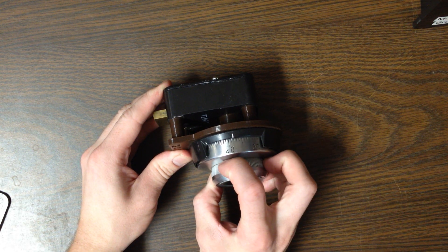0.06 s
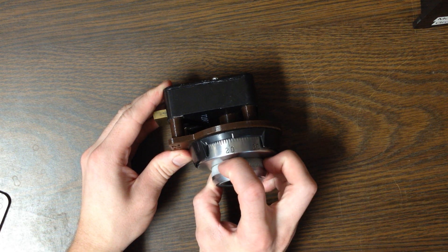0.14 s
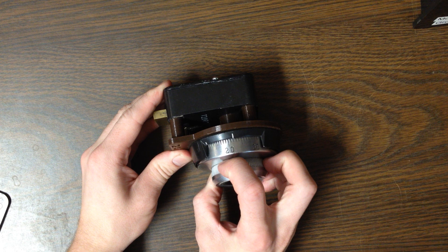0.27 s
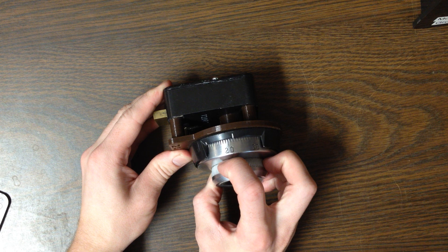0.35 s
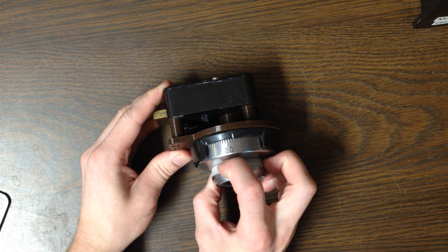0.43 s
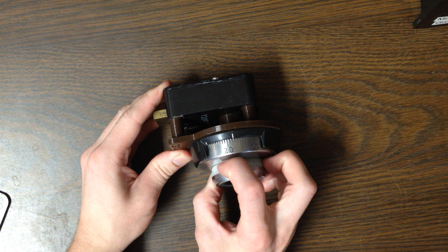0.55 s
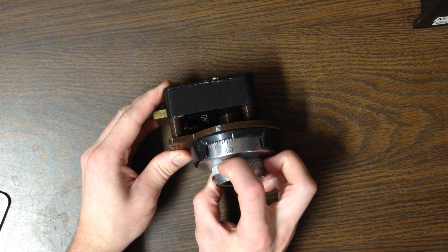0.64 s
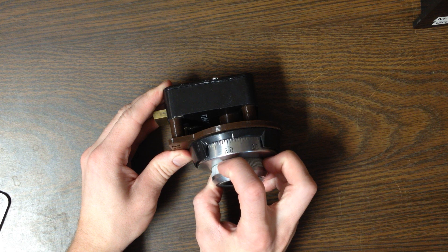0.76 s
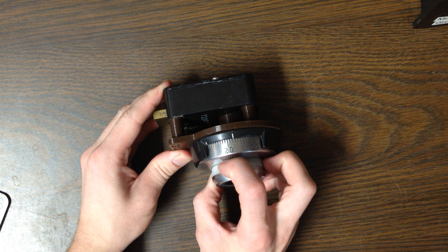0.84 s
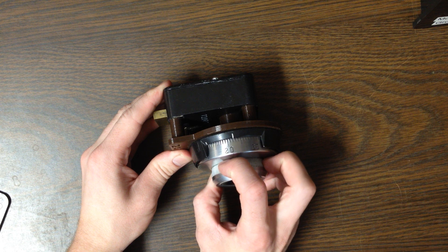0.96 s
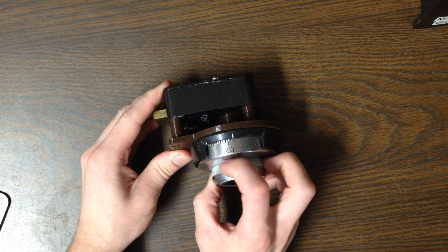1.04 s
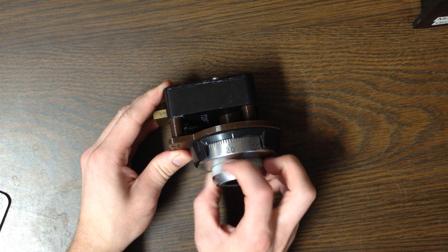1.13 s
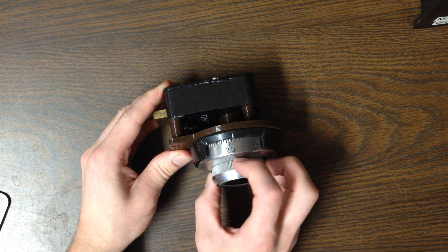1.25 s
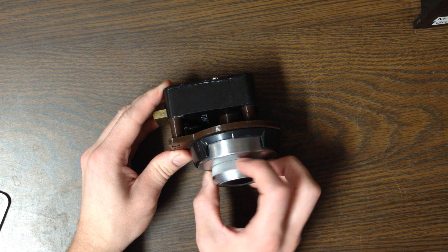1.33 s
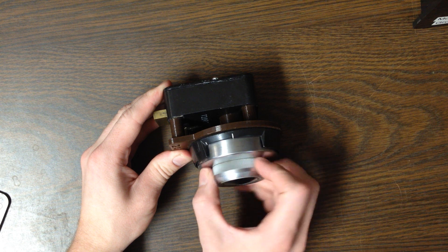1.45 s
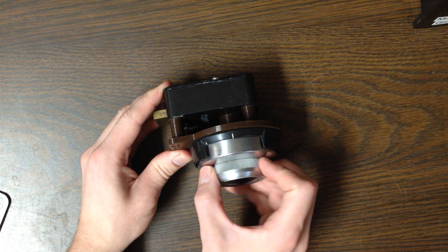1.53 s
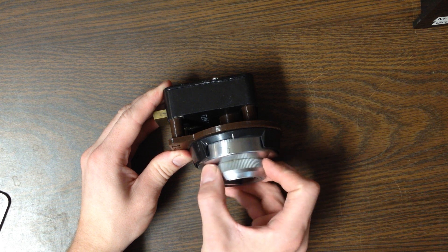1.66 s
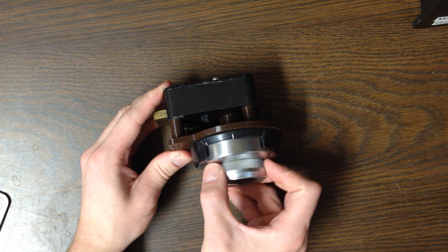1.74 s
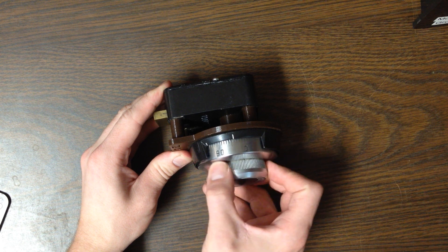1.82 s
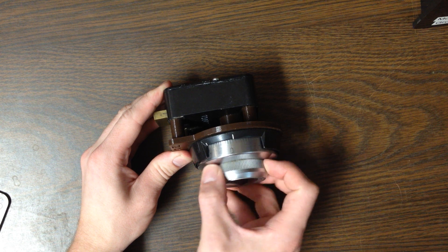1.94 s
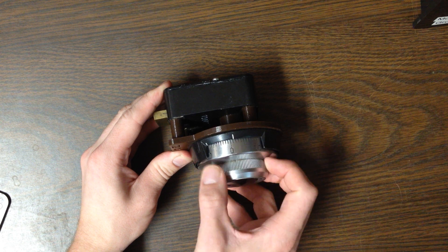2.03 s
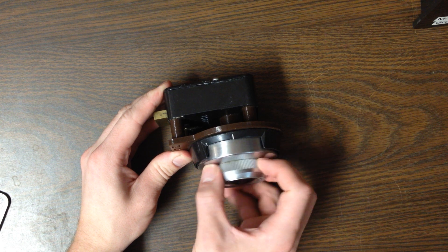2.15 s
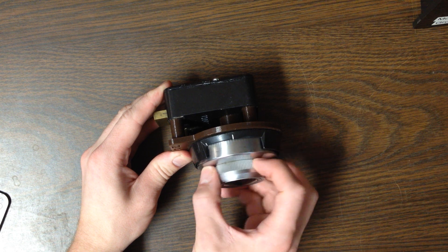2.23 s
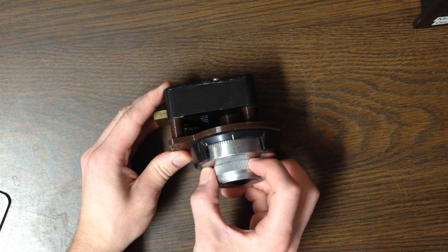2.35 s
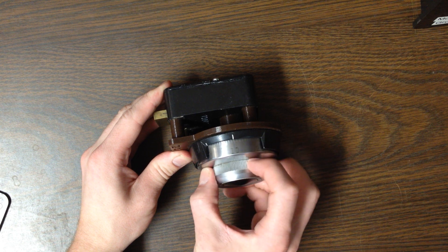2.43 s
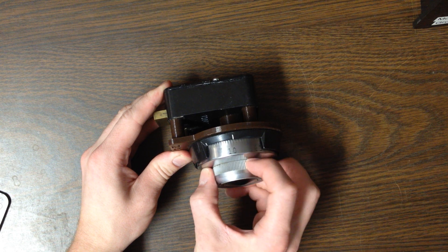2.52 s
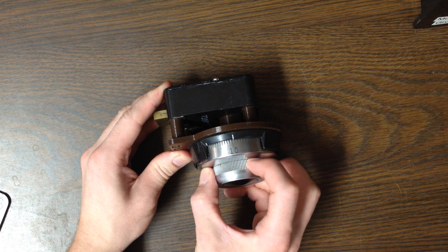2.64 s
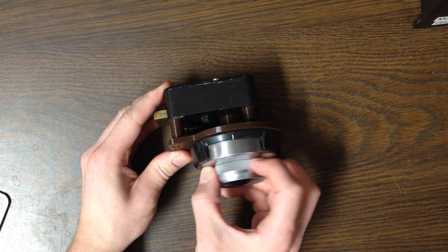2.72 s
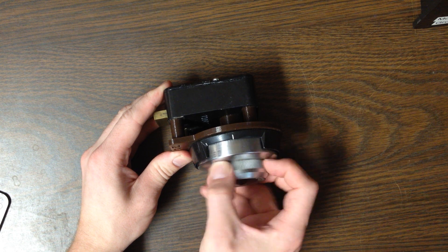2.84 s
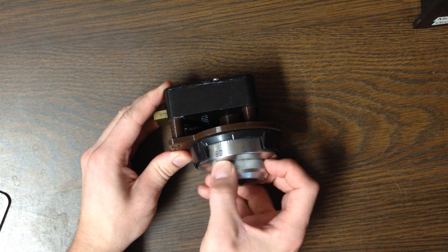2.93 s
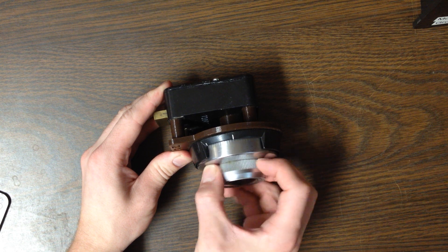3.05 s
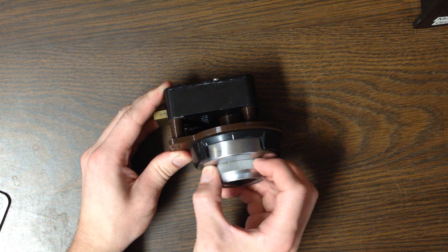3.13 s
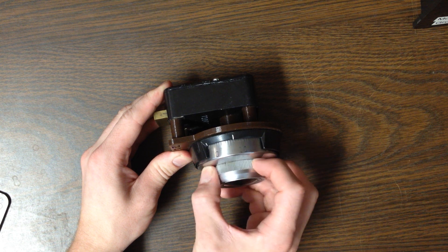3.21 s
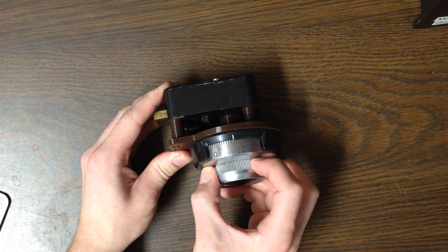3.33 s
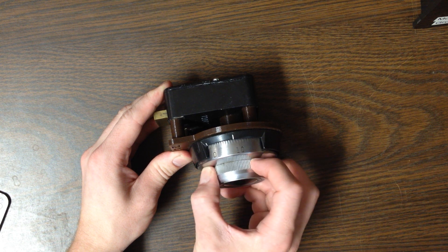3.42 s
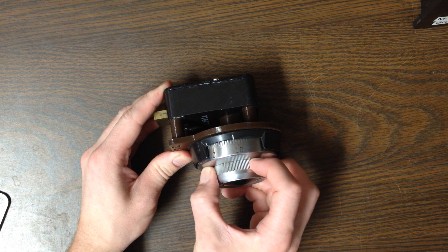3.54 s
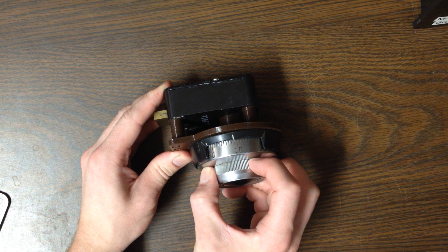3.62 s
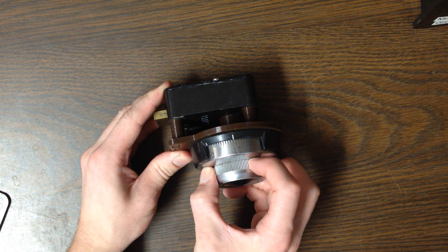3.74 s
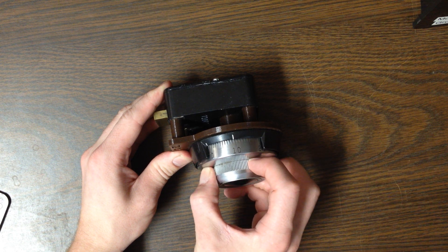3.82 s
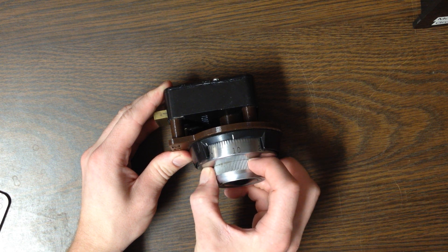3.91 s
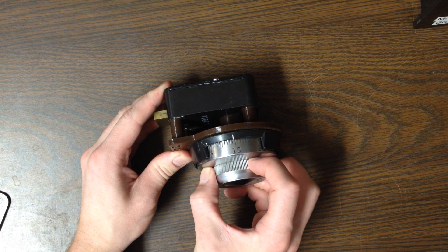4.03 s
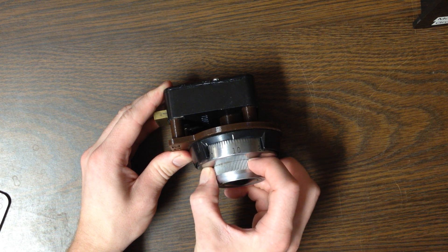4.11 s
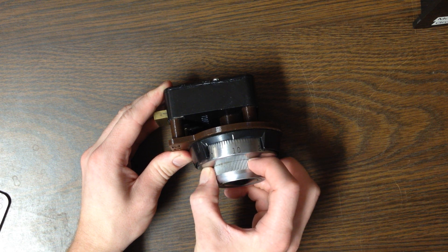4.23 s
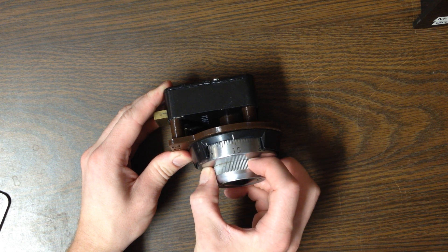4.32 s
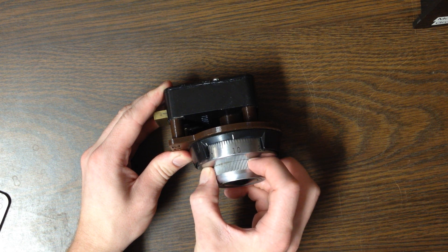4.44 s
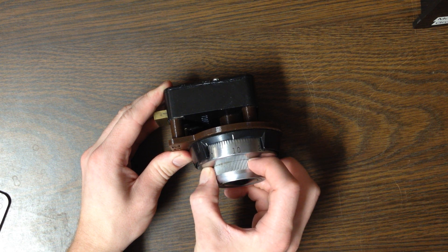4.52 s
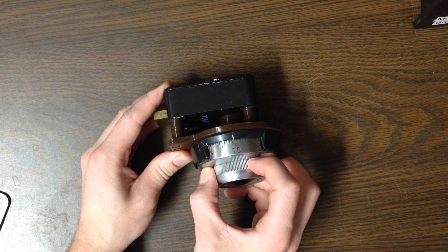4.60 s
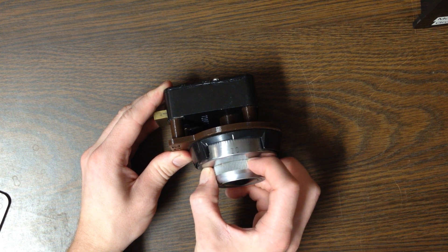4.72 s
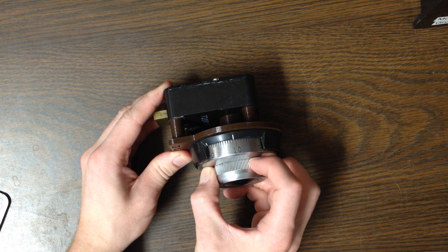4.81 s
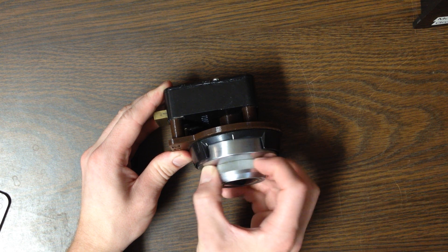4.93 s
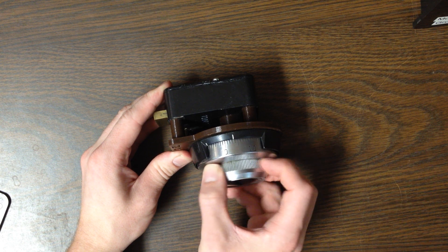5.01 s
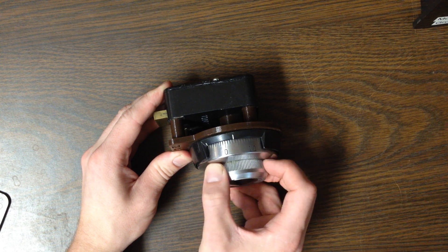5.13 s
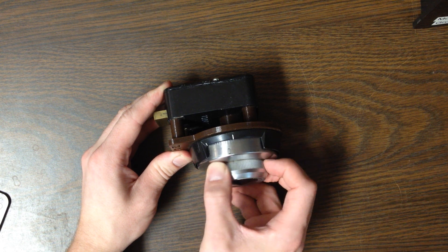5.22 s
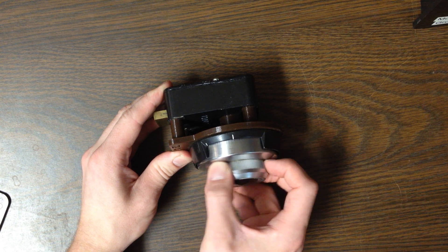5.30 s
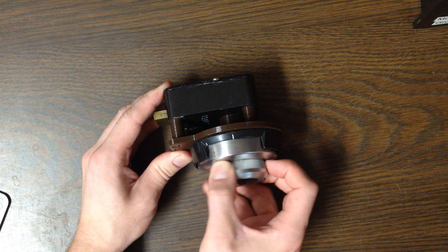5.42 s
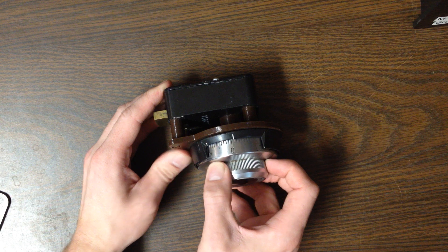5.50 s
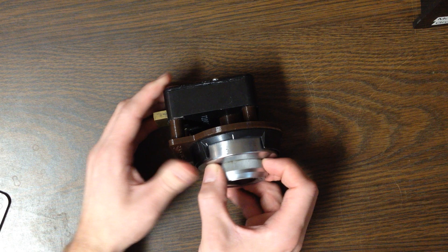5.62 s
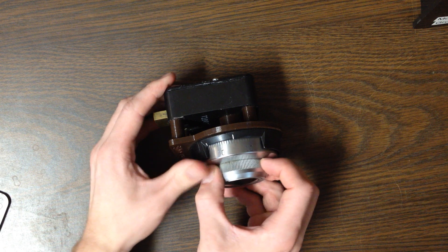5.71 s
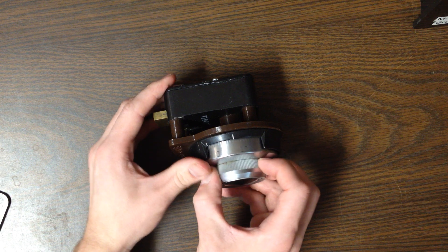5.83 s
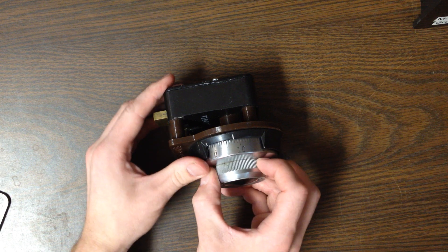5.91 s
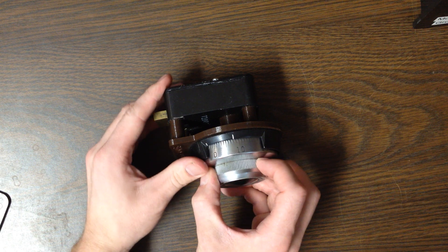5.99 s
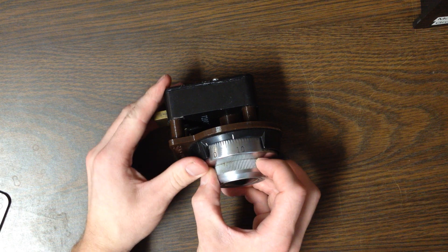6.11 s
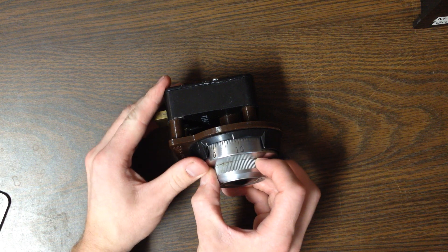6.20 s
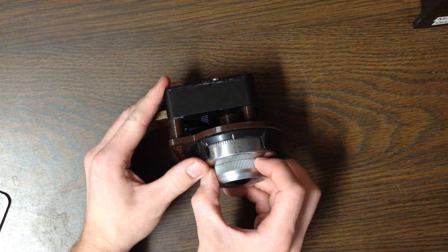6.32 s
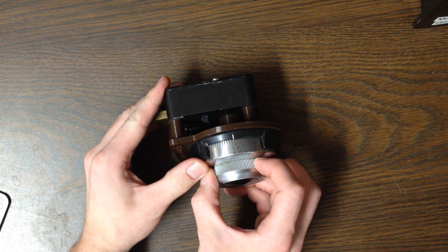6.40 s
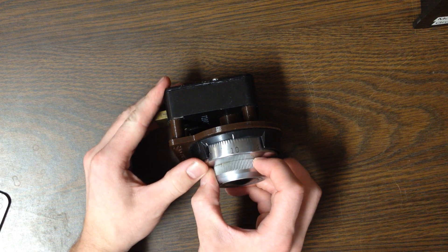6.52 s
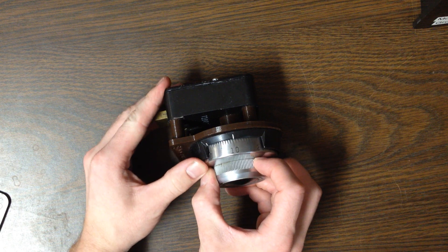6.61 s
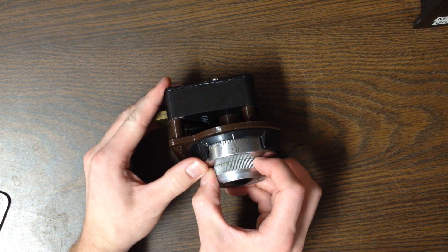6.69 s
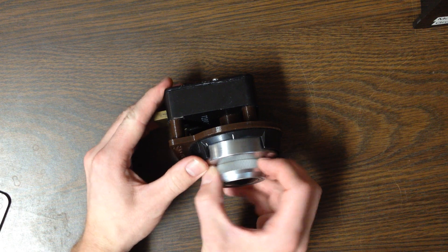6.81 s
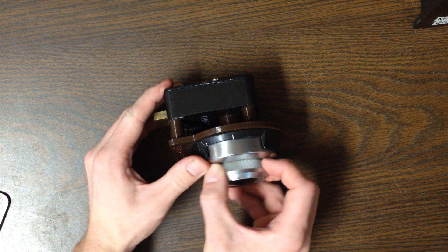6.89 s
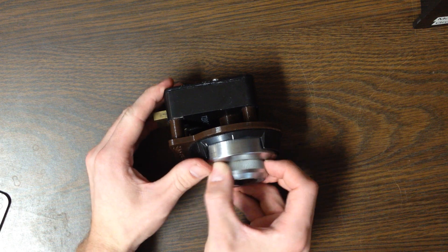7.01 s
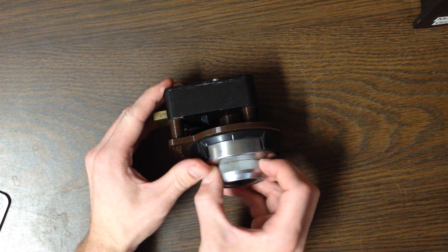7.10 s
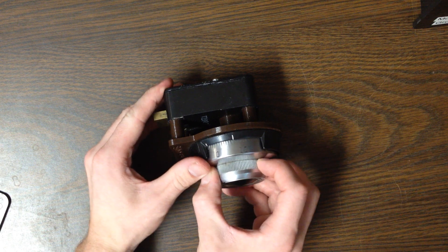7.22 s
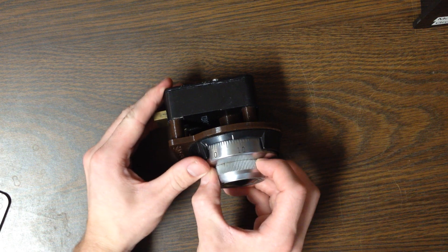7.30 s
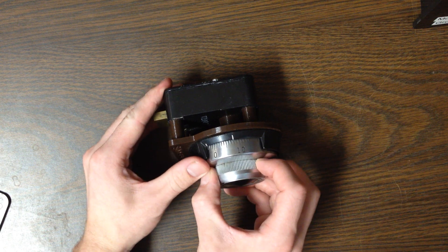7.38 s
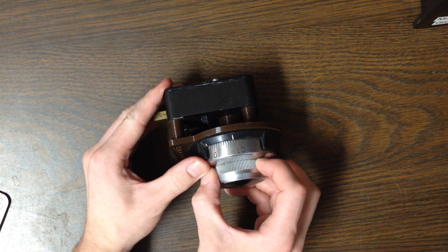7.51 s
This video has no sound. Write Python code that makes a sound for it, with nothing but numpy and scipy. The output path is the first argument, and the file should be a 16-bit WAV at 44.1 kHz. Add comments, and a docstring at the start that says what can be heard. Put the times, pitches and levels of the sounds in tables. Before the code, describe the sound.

Close by in a quiet room, a lock mechanism clicks sharply as its dial is turned one way and then the other. Three metallic snaps come first, then a pause, then two pairs. Each has a brief steel ring, a small thump on the wooden table and a short room echo. Tiny ticks of loose metal fall between them, over a faint steady hum and the rush of a distant fan.

```python
"""Turning a combination lock

A lock's dial is turned to and fro on a wooden table in a quiet room. At each pass a cam (a bump on
a wheel) flicks a springy lever: steel parts clash and bounce, the case and the table thump, and
the room rings briefly. Loose parts tick faintly in between, over a low mains hum and a fan."""
import sys
import numpy as np
from scipy import signal
from scipy.fft import rfft, irfft
from scipy.io import wavfile

SR = 44100
rng = np.random.default_rng(int(sys.argv[2]) if len(sys.argv) > 2 else 0)


def master_out(mix):
    """Clip the mix to full scale and print it as 16-bit PCM to the path in sys.argv[1]."""
    frames = np.transpose(np.atleast_2d(mix))
    ceiling = np.clip(frames, -1, 1)
    pcm = np.round(ceiling * 32767).astype(np.int16)
    wavfile.write(sys.argv[1], SR, pcm)


N = 333011
AGE = np.arange(int(.4 * SR)) / SR   # seconds since a hit
FORWARD, BACK = 0, 1   # the two ways the dial turns


# Each snap of the lever: (time [s], level [dB], turn [FORWARD or BACK], case pitch [Hz],
# extra rocking of a loosely held lock [dB])
LEVER_SNAPS = [(1.8221, -10.5, FORWARD, 403, -2), (2.5397, -13, BACK, 442, 4),
               (2.9162, -10.5, FORWARD, 406, -1), (4.7371, -13, BACK, 441, 3.5),
               (5.3884, -10, FORWARD, 406.5, -1), (6.5789, -13, BACK, 428, 4),
               (7.033, -10, FORWARD, 428, 6.5)]
# The hits in one snap, a list per turn: (delay [s], level [dB], brightness [dB per octave])
LEVER_HITS = [
    [(-.003, -33.5, -7), (0, -5, 5), (.0015, -11, -1.5), (.0052, -11.5, -1.5)],
    [(-.0080, -16.5, -10), (-.0056, -5, 0), (-.0032, -13, -0.5), (0, -2.5, 0.5), (.0010, -2, 1)],
]
# The bounce after landing, a row per turn: (delay [s], level [dB])
LEVER_BOUNCE = [(.0121, -9), (.0085, -11.5)]

def lever(steel_db=-3.0, room_db=(6.5, 5.7), bounce_per_rocking=.3):
    """The lever slips, lands and bounces; each hit spreads its own way, so it gets its own echo."""
    out = np.zeros(N)
    for time, snap_db, turn, _, rocking_db in LEVER_SNAPS:
        bounce_s, bounce_db = LEVER_BOUNCE[turn]
        bounce = (bounce_s, bounce_db + bounce_per_rocking * rocking_db, 0)
        for delay, level_db, bright_db in LEVER_HITS[turn] + [bounce]:
            hit = clash(turn, bright_db) + from_db(steel_db) * steel_ring(turn)
            echo = from_db(room_db[turn]) * room_echo()
            add(out, time + delay, from_db(snap_db + level_db) * (hit + echo))
    return out


# The tone of the clash, a list per turn: (frequency [Hz], level [dB])
CLASH_TONE = [
    [(100, -26), (600, -8), (900, -6), (1350, -20.5), (1900, -6), (2900, -12.5), (4400, -6), (5600, -14),
     (7100, -14.5), (8200, 0), (10000, -6), (12500, -0.5), (13400, 6), (15300, -8)],
    [(60, -35.5), (150, -20.5), (650, -10), (880, -0.5), (1500, -14), (1950, -9.5), (3000, -15.5),
     (4500, -3), (5300, -7.5), (7100, -6.5), (8200, 0), (9300, -7), (12300, -5.5), (14000, -6), (15300, -1)],
]

def clash(turn, bright_db, crack_s=.013, rattle_s=.068, rattle_db=-13.5):
    """Steel meets steel: many notes blur into a sharp crack and a short rattle."""
    fade = decay(crack_s) + from_db(rattle_db) * decay(rattle_s)
    return noise(CLASH_TONE[turn], len(AGE), bright_db) * fade


# Notes of the lever and cam: (pitch [Hz], forward level [dB], back level [dB], fade time [s])
STEEL_NOTES = [(1620, -35.5, -27.5, .04), (3520, -24.5, -34, 0.038), (4520, -10, -9.5, 0.036),
               (6300, -17, -13, 0.042), (7590, -33, -16, 0.025), (7950, -14.5, -14, 0.02),
               (10940, -4.5, -20, .02), (10870, -29.5, -5, 0.025), (12800, -18, -34, .02),
               (12960, -16, -26, .022), (13200, -17, -40, .022), (13800, -20, -20.5, .022),
               (15700, -17, -21, .018)]

def steel_ring(turn):
    """A few notes stand out; their pitch shifts a little with the pressure of each hit."""
    shifts = rng.normal(1, .01, len(STEEL_NOTES))
    return sum(ring(hz * shift, levels_db[turn], fade_s, phase=rng.uniform(0, 2 * np.pi))
               for shift, (hz, *levels_db, fade_s) in zip(shifts, STEEL_NOTES))


# Two blows on the case, a row per turn:
# (delay [s], rough gap [s], rise time [s], first level [dB], second level [dB])
CASE_BLOWS = [(-.003, .0128, 0.0078, -11.5, -17), (-.0075, .007, 0.0048, -13.5, -5)]

def thumps(table_db=(-17.5, -16), thud_early_s=.0025, damping_per_rocking=.52):
    """The lever knocks the case twice in quick succession; the table thuds beneath."""
    out = np.zeros(N)
    for time, snap_db, turn, pitch_hz, rocking_db in LEVER_SNAPS:
        first_blow_s, gap_s, rise_s, first_db, second_db = CASE_BLOWS[turn]
        knock = from_db(snap_db - damping_per_rocking * rocking_db) * case_knock(pitch_hz, rise_s)
        # the second blow falls in step with the swing of the case and keeps it going
        second_blow_s = first_blow_s + np.round(gap_s * pitch_hz) / pitch_hz
        add(out, time + first_blow_s, from_db(first_db) * knock)
        add(out, time + second_blow_s, from_db(second_db) * knock)
        add(out, time - thud_early_s, from_db(snap_db + table_db[turn] + rocking_db) * table_thud())
    return out


# Notes of the lock's case: (pitch [times the case pitch], level [dB], fade time [s])
CASE_NOTES = [(.905, -4, .09), (1.0, 7.5, .054), (1.09, -10, .09), (1.39, -27.5, 0.087),
              (1.879, -28.5, 0.088), (2.15, -20.5, .11)]

def case_knock(pitch_hz, rise_s):
    """The case rings at a pitch that depends on the grip of the hand."""
    notes = sum(ring(pitch_hz * ratio, level_db, fade_s) for ratio, level_db, fade_s in CASE_NOTES)
    return swell(rise_s) * notes


# Notes of the table top: (pitch [Hz], level [dB], fade time [s])
WOOD_NOTES = [(174.3, -6, 0.15), (213.6, 0, 0.098), (276, -8, 0.12)]

def table_thud(rise_s=.0089):
    """The heavy table top takes a moment to get going."""
    return swell(rise_s) * sum(ring(*note) for note in WOOD_NOTES)


# Notes of a free steel part: (pitch [Hz], forward level [dB], back level [dB], fade time [s])
FREE_PART_NOTES = [(1590, -40.5, -31.5, 0.2315), (3474, -29, -35, .11), (3880, -36.5, -43, .22),
                   (4070, -37, -43, .22)]

def free_part(spread_db=2.5):
    """Each snap shakes a free part, which sings on faintly, every note at a strength of its own."""
    out = np.zeros(N)
    for time, snap_db, turn, *_ in LEVER_SNAPS:
        for hz, *levels_db, fade_s in FREE_PART_NOTES:
            level_db = rng.normal(snap_db + levels_db[turn], spread_db)
            add(out, time, ring(hz, level_db, fade_s))
    return out


# Light touches: loose parts, and the cam meeting the lever just before some forward snaps (time [s], level
# [dB], brightness [dB per octave])
LOOSE_TOUCHES = [(1.449, -49.5, -5), (1.463, -50.5, 4), (1.525, -45.5, -1.5), (1.6339, -52.5, -1.5),
                 (2.1992, -43, -0.2), (2.808, -45.5, -0.5), (3.075, -42, 0.5), (5.3483, -43.5, -6.5),
                 (5.654, -45, 0), (6.868, -46.5, 0.5), (7.0088, -50, -3), (7.144, -42, -0.5)]

def loose_parts(settle_s=.037, settle_db=-10.5, soft_bright_db=-4.5, turning_s=(1.5, 7.2)):
    """Loose parts touch, then settle with a softer tick; a few faint, dull ticks come at random."""
    out = np.zeros(N)
    settling = [(time + settle_s, level_db + settle_db, soft_bright_db)
                for time, level_db, _ in LOOSE_TOUCHES]
    faint = [(rng.uniform(*turning_s), rng.normal(-58, 1), soft_bright_db) for _ in range(6)]
    for time, level_db, bright_db in LOOSE_TOUCHES + settling + faint:
        add(out, time, from_db(level_db) * tick(bright_db))
    return out


# The tone of a tick: (frequency [Hz], level [dB])
TICK_TONE = [(100, -13.5), (400, 0), (1000, -5), (1500, -5), (3200, -6.5), (3800, 1.5), (4800, -2.5),
             (5500, -12.5), (6350, 0.5), (7000, -8.5), (10000, -4.5), (12400, -4.5), (13100, -2),
             (15000, -3)]

def tick(bright_db, click_s=.012, tail_s=.06, tail_db=-13.5, boost_db=4.5):
    """One light touch of steel: a click with a short tail."""
    fade = swell(rise_s=.0007) * (decay(click_s) + from_db(tail_db) * decay(tail_s))
    return from_db(boost_db) * noise(TICK_TONE, len(AGE), bright_db) * fade


# Bumps of the lock on the table: (time [s], level [dB])
LOCK_BUMPS = [(2.024, -38), (5.091, -42.5)]

def rocking():
    """Now and then the lock rocks under the hand and bumps the table."""
    out = np.zeros(N)
    for time, level_db in LOCK_BUMPS:
        add(out, time, from_db(level_db) * table_thud())
    return out


# The tone of the room's echo: (frequency [Hz], level [dB])
ROOM_TONE = [(60, -11.5), (160, 2.5), (450, 5), (650, 4), (1000, 5), (1600, 3), (2400, -3.5), (4000, 1.5),
             (5500, -2.5), (7000, -2), (8200, 0.5), (11000, 0.5), (13400, 2), (15300, -4.5)]

def room_echo(rise_s=.007, fade_s=.25):
    """Sound bounces off nearby walls and blurs into a short echo."""
    echo = noise(ROOM_TONE, len(AGE)) * swell(rise_s) * decay(fade_s)
    return echo / np.linalg.norm(echo)


# The tone of the fan's rush: (frequency [Hz], level [dB])
FAN_TONE = [(30, -25.5), (80, -17), (105, -12.5), (150, 1), (230, -2.5), (400, -4.5), (540, -11.5),
            (660, -15.5), (950, -17), (1300, -19.5), (2500, -25.5), (5000, -29.5), (10000, -36.5),
            (14000, -33)]
# Notes in that rush: (pitch [Hz], width [Hz], level [dB])
FAN_NOTES = [(295, 25, -86), (519, 16, -70), (841.4, 20, -75.5), (915, 20, -80)]

def fan(rush_db=-61):
    """A far fan makes a steady rush in which a few pitches ring."""
    out = from_db(rush_db) * noise(FAN_TONE, N)
    for hz, width_hz, level_db in FAN_NOTES:
        narrow_filter = signal.iirpeak(hz, hz / width_hz, fs=SR)
        note = signal.lfilter(*narrow_filter, rng.standard_normal(N))
        out += from_db(level_db) * note / np.std(note)
    return out


# Notes of the hum: (pitch [Hz], level [dB])
HUM_NOTES = [(120, -64), (240, -68), (360, -70), (480, -71.5)]

def mains_hum():
    """Mains electricity hums on a few low, steady notes."""
    time = np.arange(N) / SR
    return sum(from_db(level_db) * np.sqrt(2) * np.sin(2 * np.pi * (hz * time + rng.random()))
               for hz, level_db in HUM_NOTES)


def from_db(db):
    """Turn decibels into a number to multiply a sound by."""
    return 10 ** (np.asarray(db) / 20)


def add(out, time, sound):
    """Mix a sound in at a time in seconds."""
    start = round(time * SR)
    out[start:start + len(sound)] += sound[:len(out) - start]


def noise(tone, size, bright_db=0.0):
    """Noise of strength 1 with a given tone, made brighter by bright_db per octave."""
    hz, level_db = np.transpose(tone)
    tilted_db = level_db + bright_db * np.log2(hz / hz[-1])
    octaves = np.log2(np.maximum(np.fft.rfftfreq(size, 1 / SR), 1))
    shape = from_db(np.interp(octaves, np.log2(hz), tilted_db))
    hiss = irfft(rfft(rng.standard_normal(size)) * shape, size)
    return hiss / np.std(hiss)


def decay(fade_s):
    """A fade-out that drops 60 dB in the fade time."""
    return from_db(-60 * AGE / fade_s)


def swell(rise_s):
    """A smooth rise from silence."""
    return 1 - np.exp(-(AGE / rise_s) ** 2)


def ring(hz, level_db, fade_s, phase=0.0):
    """One fading note of something struck."""
    return from_db(level_db) * decay(fade_s) * np.sin(2 * np.pi * hz * AGE + phase)


def scene(thump_echo_db=-18.0, small_echo_db=-11.5, bass_cut_hz=115):
    """The lock close by, its echo, the fan and the hum."""
    snaps, knocks = lever(), thumps()
    small_sounds = loose_parts() + rocking()
    to_walls = from_db(thump_echo_db) * knocks + from_db(small_echo_db) * small_sounds
    lock = snaps + knocks + free_part() + small_sounds
    lock += signal.fftconvolve(to_walls, room_echo())[:N]
    # so small a thing gives off little deep bass
    lock = signal.sosfilt(signal.butter(3, bass_cut_hz, "high", fs=SR, output="sos"), lock)
    return (lock + fan() + mains_hum())[None]


def record(dry, cutoff_hz=15400):
    """Cut away the very highest treble."""
    return signal.sosfilt(signal.ellip(12, .1, 80, cutoff_hz, fs=SR, output="sos"), dry)


dry = scene()
out = record(dry)
master_out(out)
```